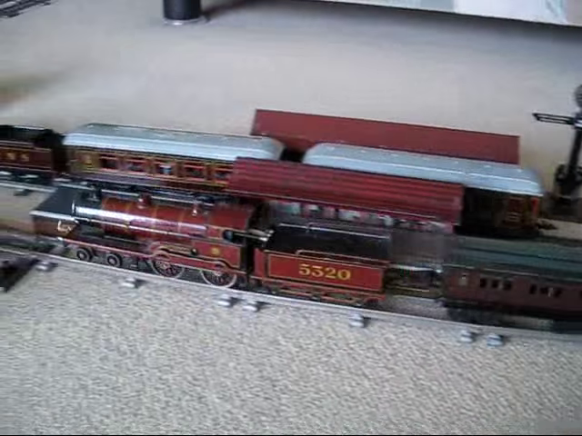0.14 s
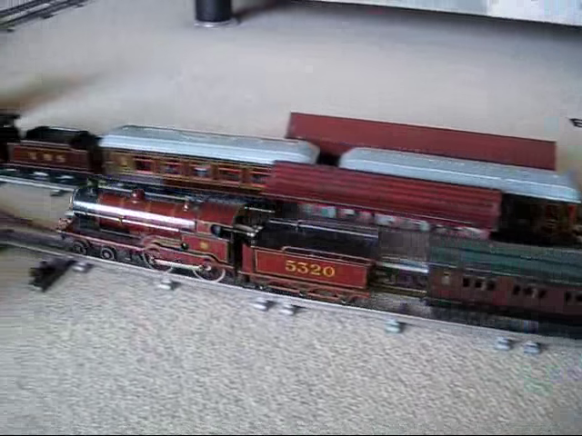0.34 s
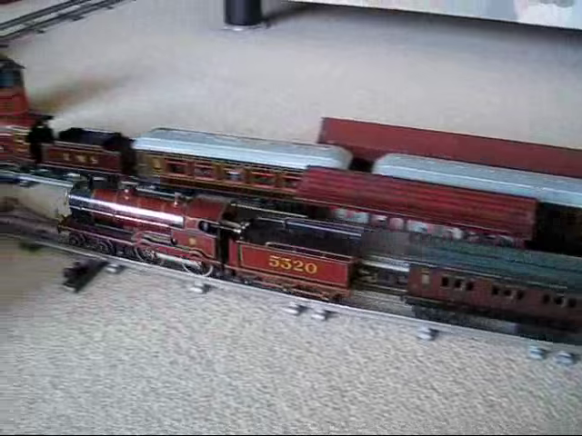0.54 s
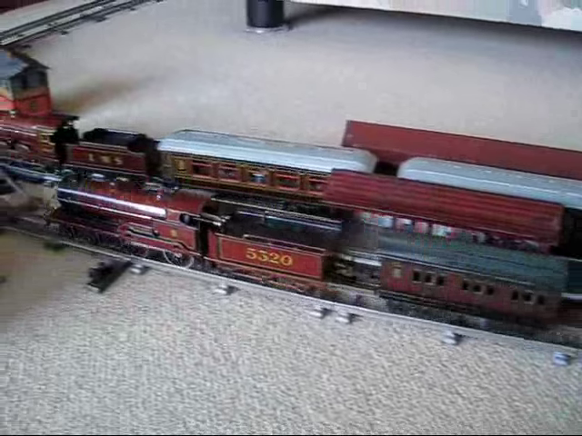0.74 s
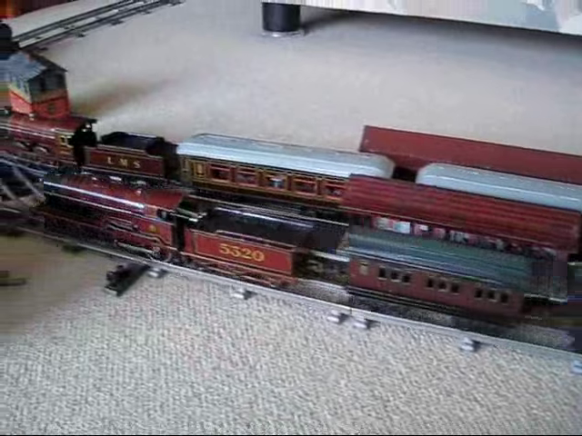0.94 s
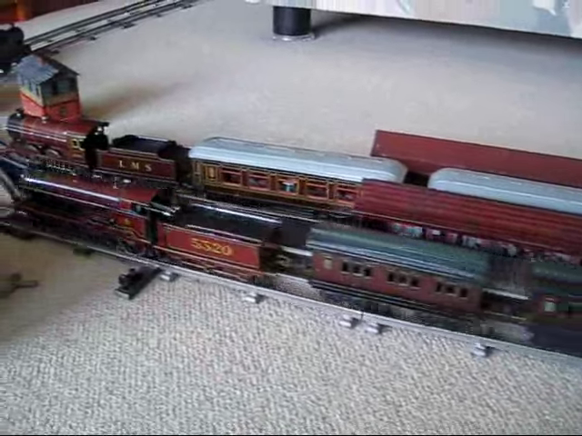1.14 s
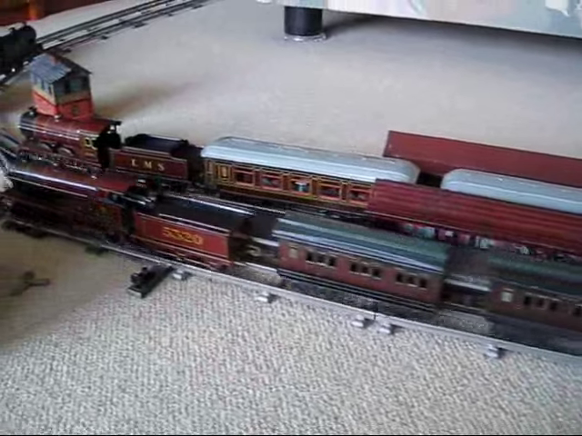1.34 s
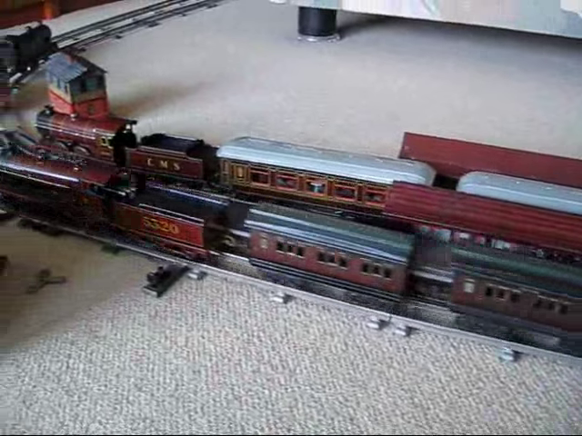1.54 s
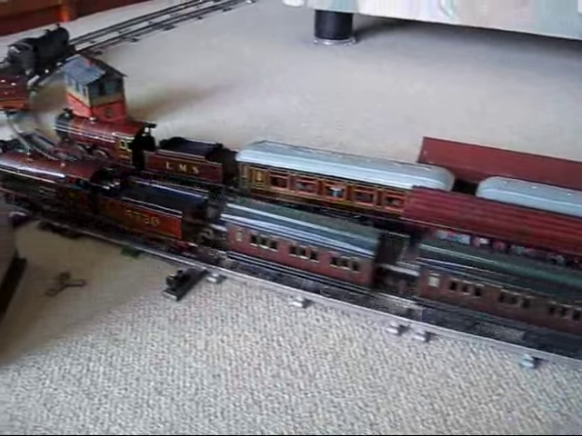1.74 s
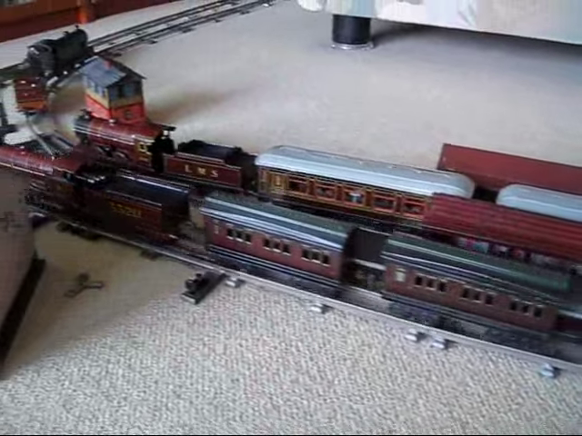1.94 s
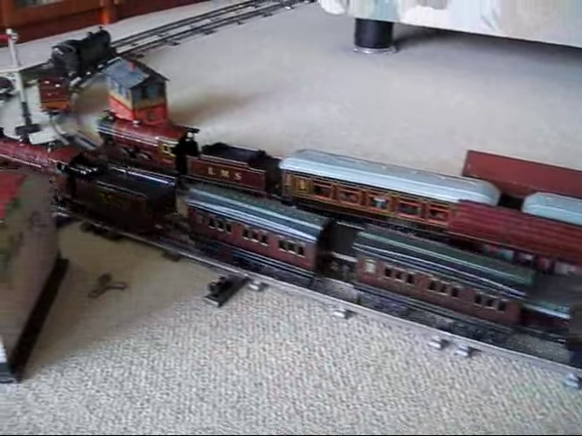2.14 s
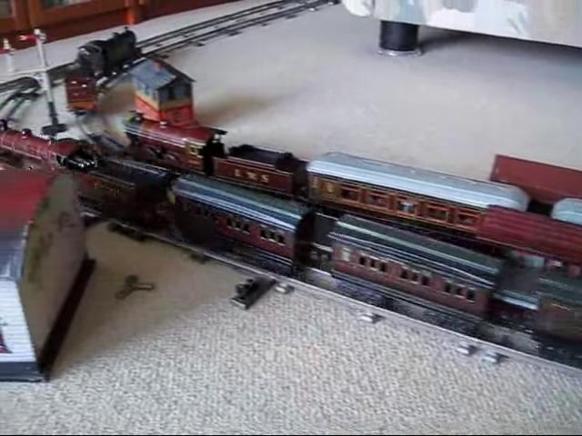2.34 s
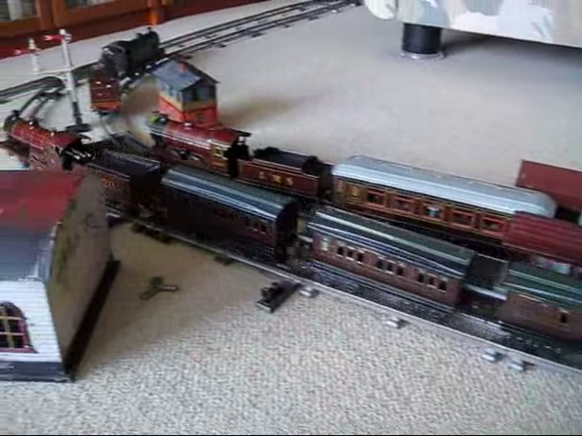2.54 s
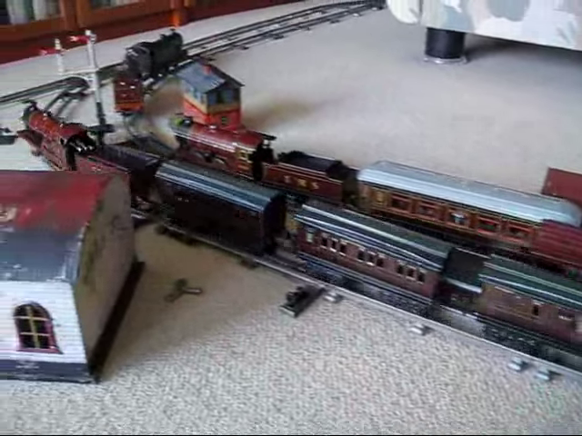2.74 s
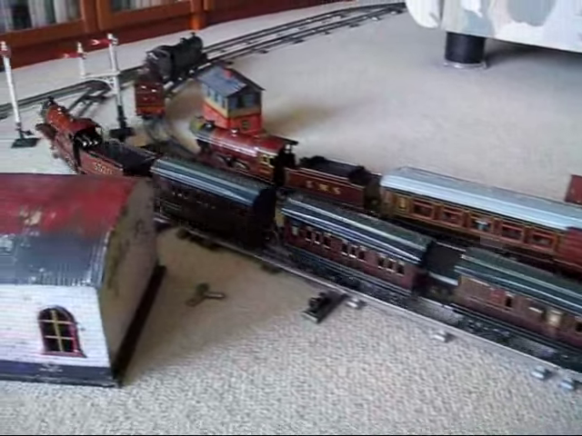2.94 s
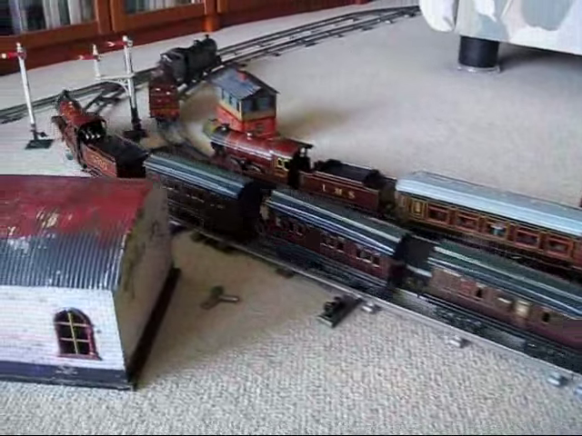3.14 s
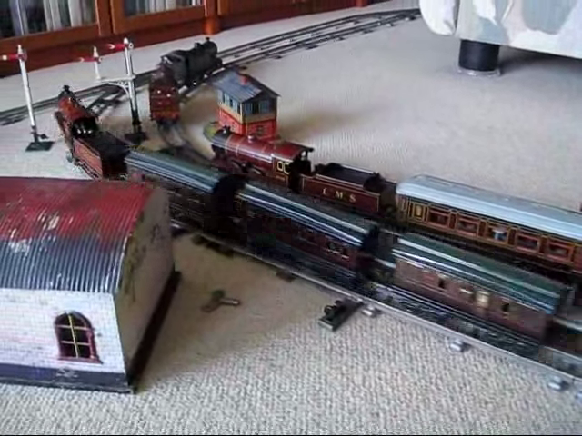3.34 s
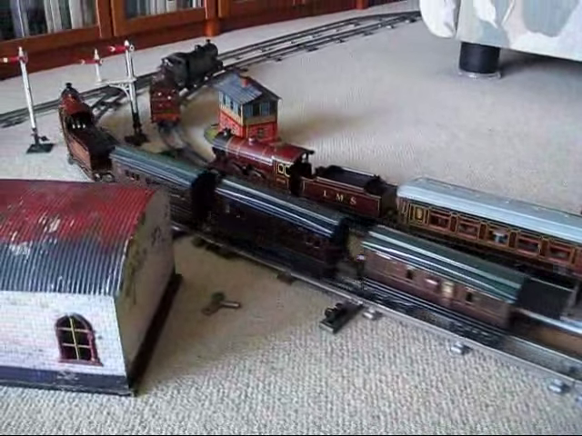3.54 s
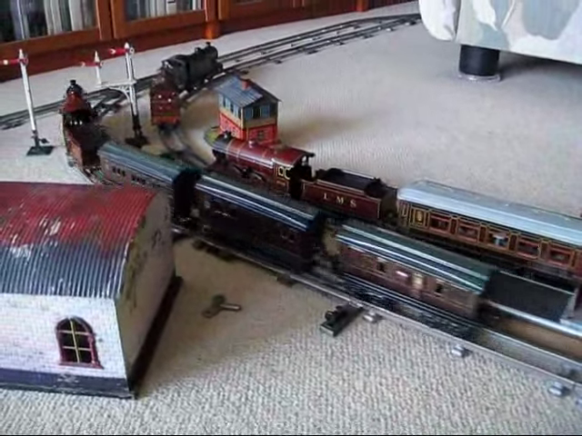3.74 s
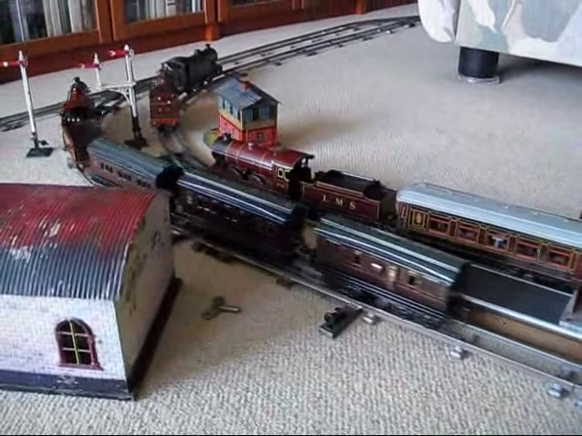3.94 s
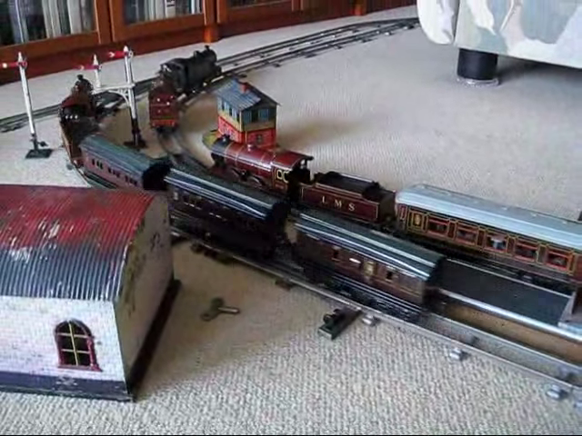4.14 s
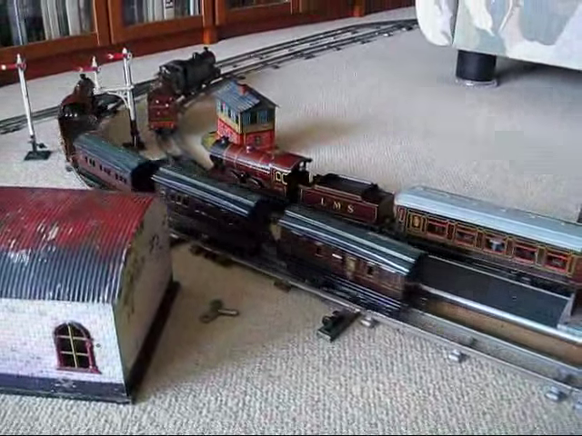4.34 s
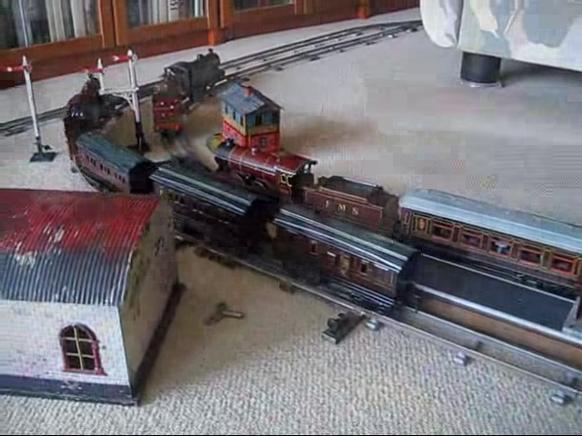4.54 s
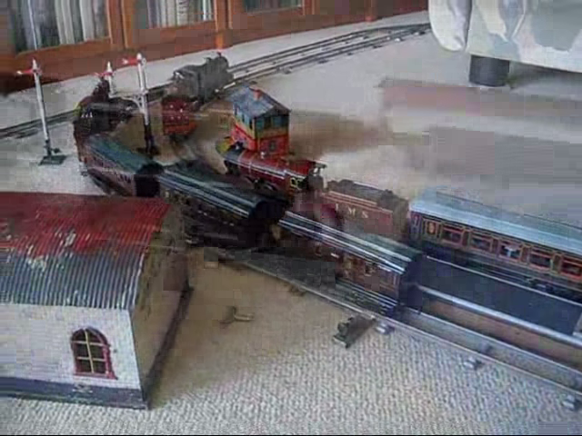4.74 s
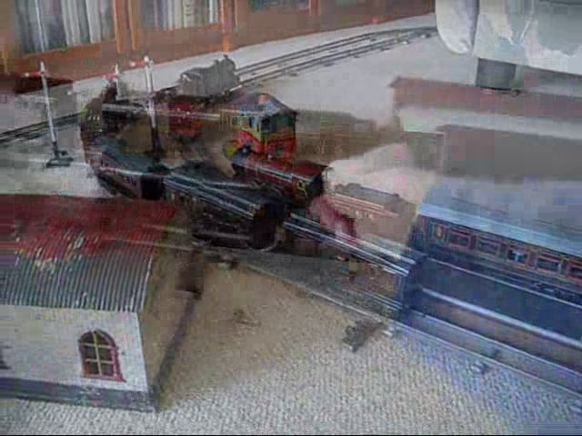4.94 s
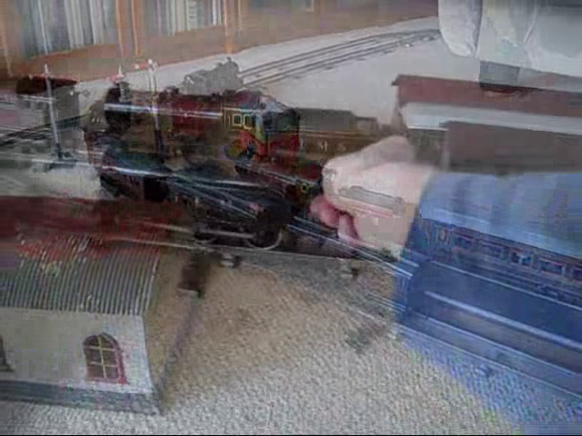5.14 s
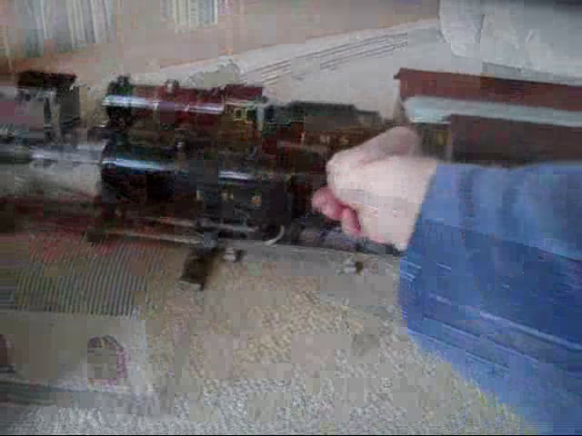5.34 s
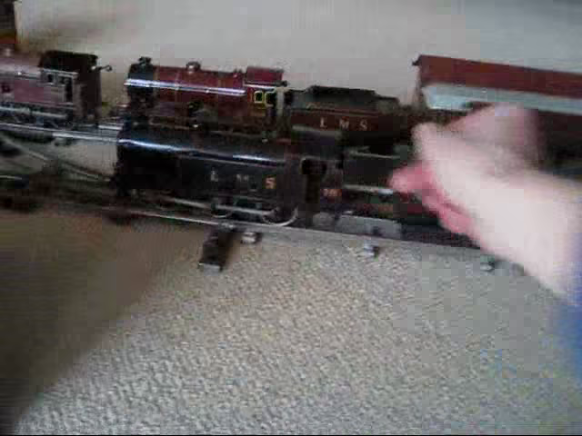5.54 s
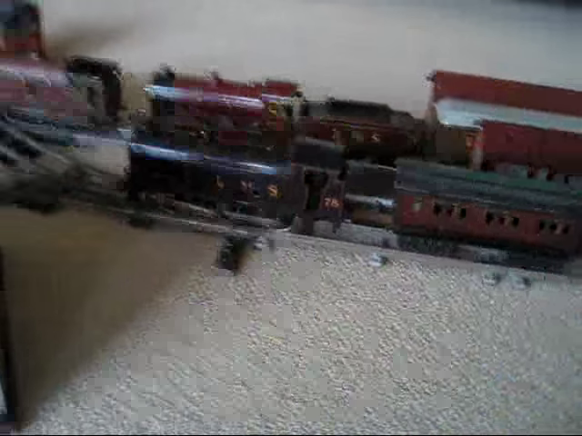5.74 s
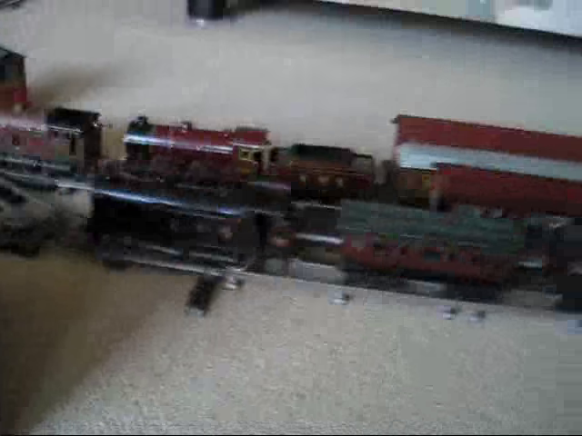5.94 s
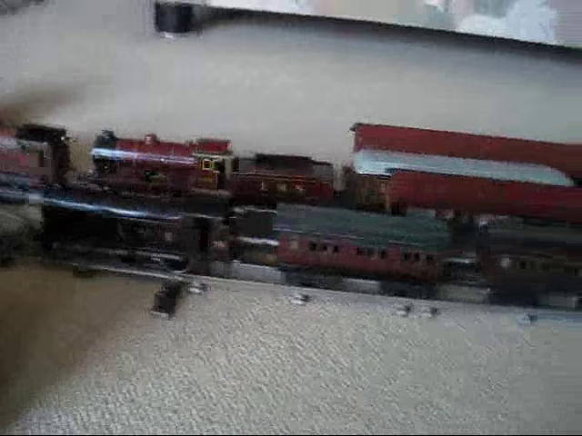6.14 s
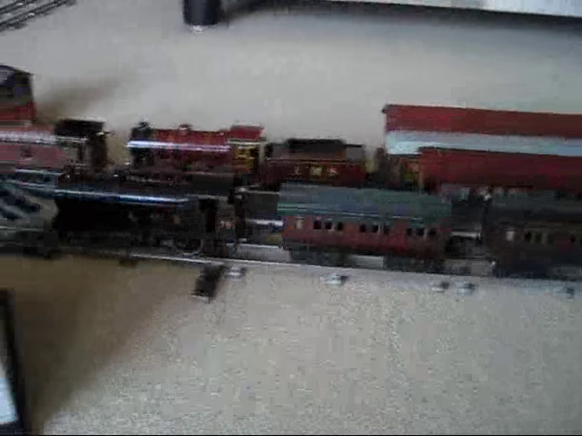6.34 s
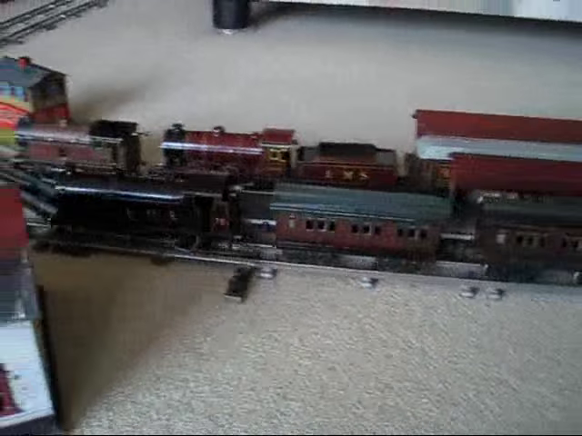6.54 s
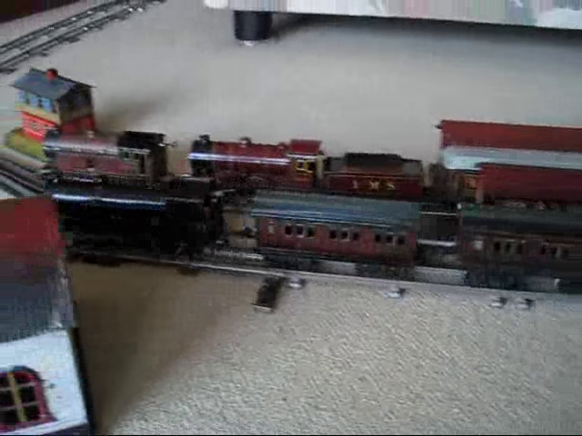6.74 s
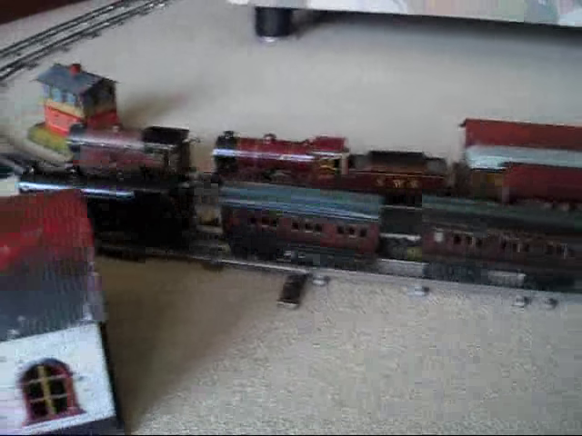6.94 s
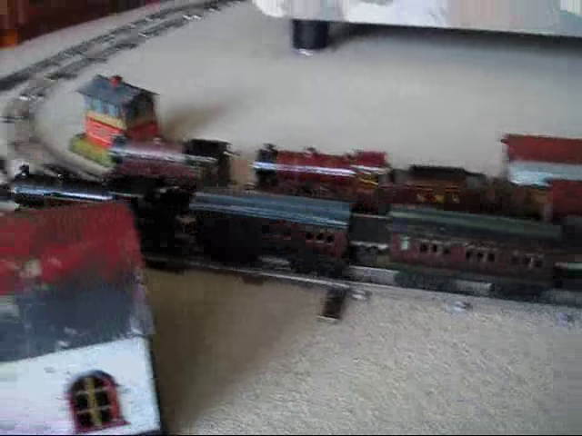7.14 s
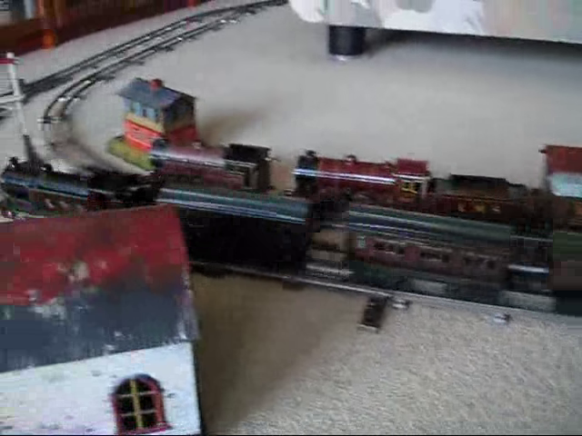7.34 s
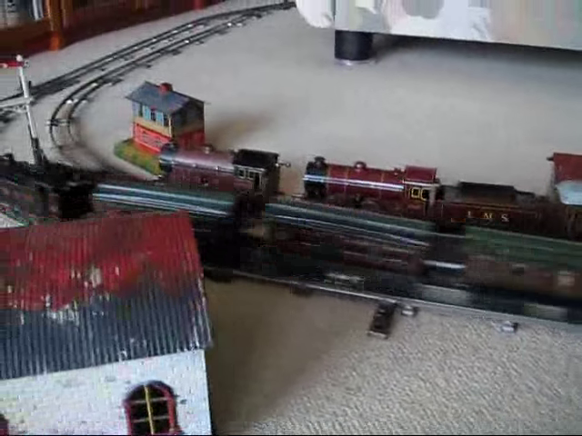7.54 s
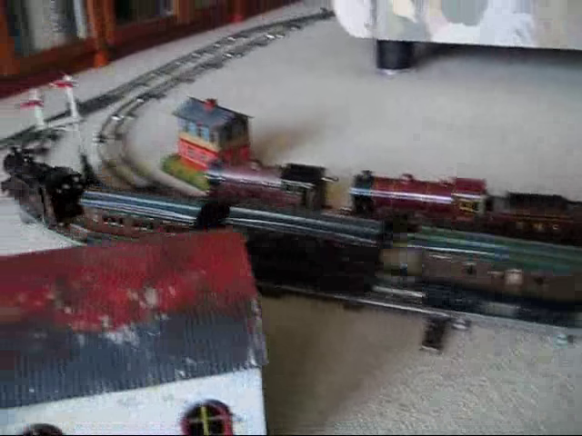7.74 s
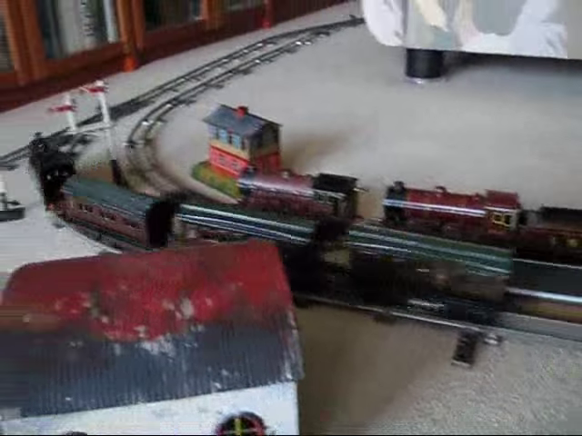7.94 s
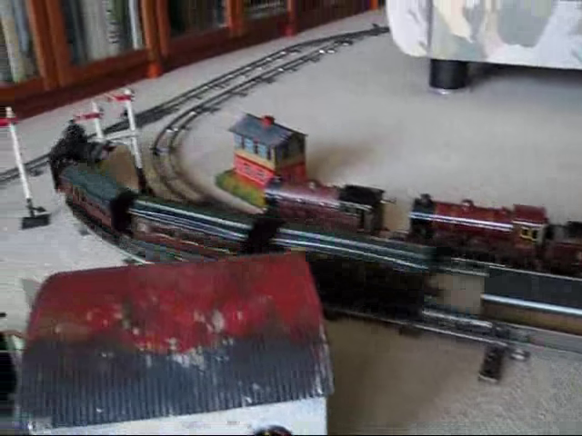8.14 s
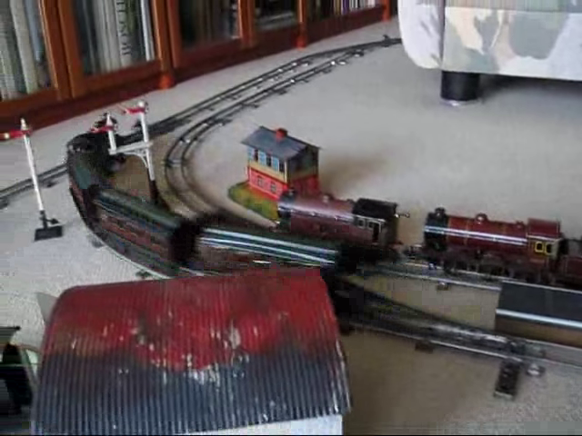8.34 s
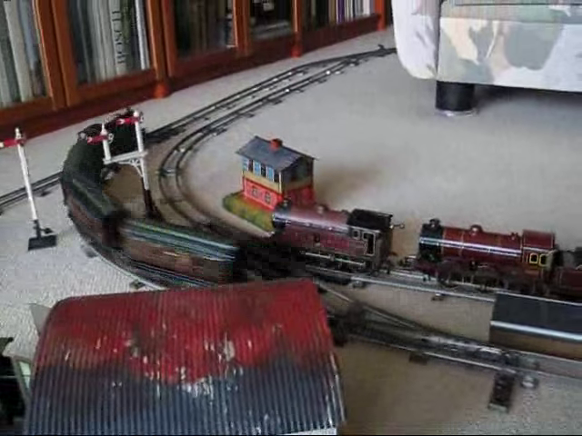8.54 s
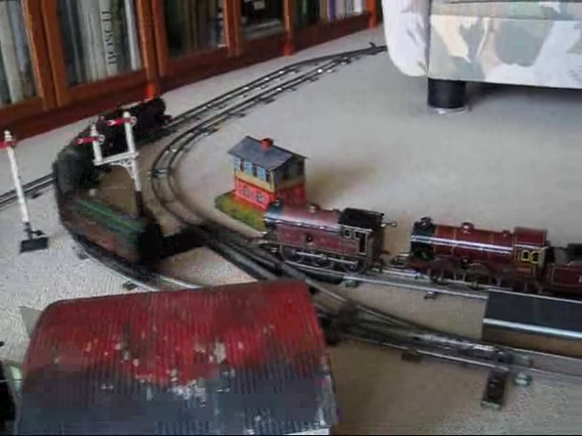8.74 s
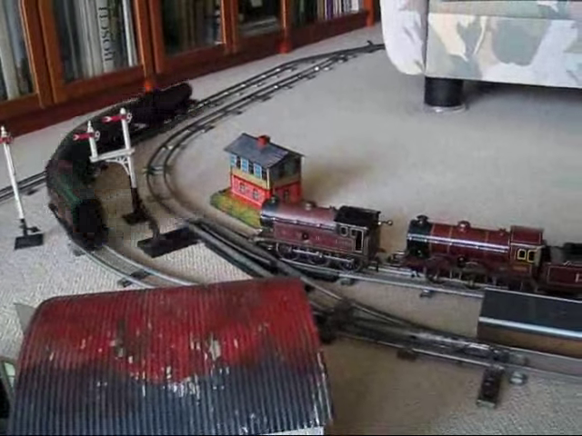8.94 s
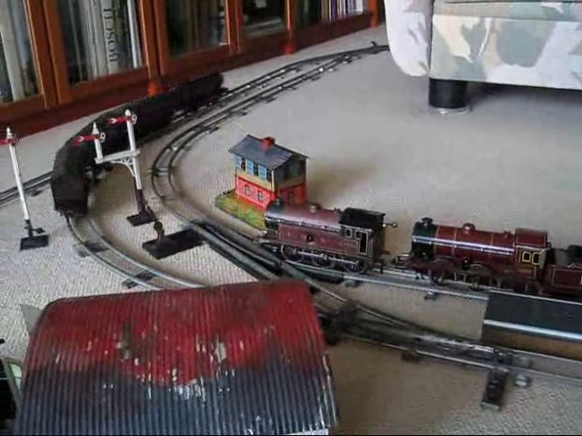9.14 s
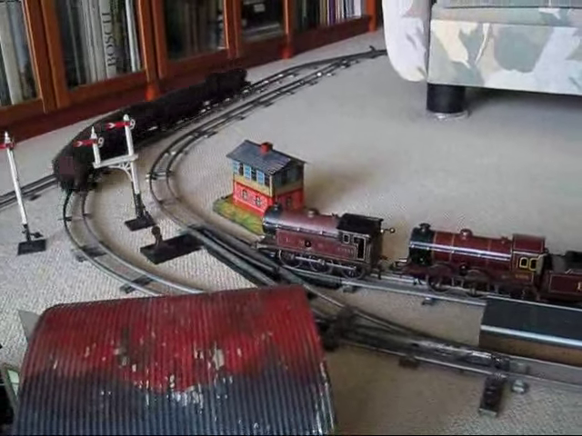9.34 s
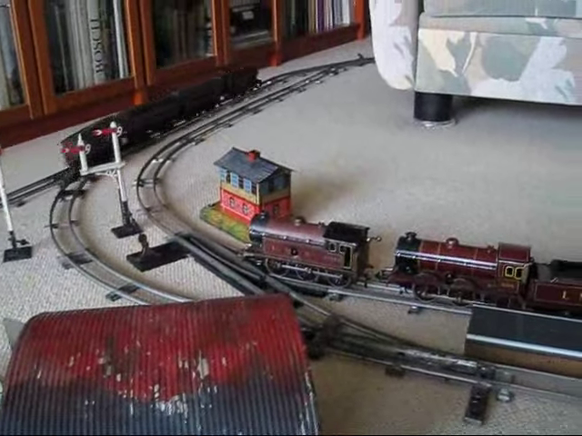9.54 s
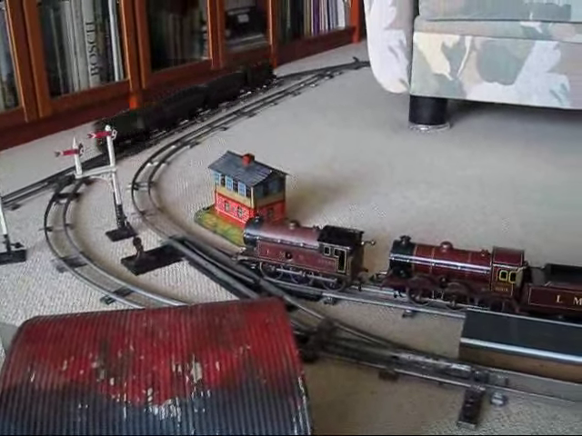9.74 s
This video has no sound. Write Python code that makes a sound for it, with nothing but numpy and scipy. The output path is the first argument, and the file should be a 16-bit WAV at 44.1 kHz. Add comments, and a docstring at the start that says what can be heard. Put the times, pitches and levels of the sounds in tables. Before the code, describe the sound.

Close, slightly coarse camera sound of two toy trains on metal rails. The first is already rattling and whirring, with clicks at the joints and one strong clank, then dies away. Quiet room air and small tin clanks fill the gap. The second starts hesitantly, quickly swells to a hissy, rattling rush, dips briefly, then continues with harsher grinding in the bend. Small, carpeted indoor space.

```python
"""In a small carpeted room, two clockwork tinplate trains run one after the other over metal track.
Noisy wheel knocks rumble through the coaches and grind in the curve; gear ticks whirr in the motor frames.
Random ticks and bright noise make loose tin rattle and flanges chatter; rail joints click.
Between the runs the second engine clanks, as ringing tin modes, while a hand holds it and lets it go.
Short noise echoes give the room around the toys, over a bed of quiet air."""
import sys
import numpy as np
from scipy import signal
from scipy.fft import rfft, irfft, next_fast_len
from scipy.io import wavfile
from scipy.ndimage import uniform_filter1d, map_coordinates

SR = 44100
rng = np.random.default_rng(int(sys.argv[2]) if len(sys.argv) > 2 else 0)


def store_pcm(level_fs):
    """Save levels as 16-bit WAV."""
    pcm = np.round(np.clip(level_fs, -1, 1) * 32767).astype(np.int16)
    wavfile.write(sys.argv[1], SR, np.atleast_2d(pcm).T)


N = 436149

# Rolling wheels of each train, one table a train; the first run fades out near 4.7 s. Each row: time in
# seconds, relative level in dB.
ROLLING_LEVELS = [
    [(0.0, -29), (0.39, -28), (2.13, -27.5), (2.84, -28.5), (3.64, -34), (4.35, -41.5), (4.74, -52.5),
     (4.9, -71)],
    [(5.8, -48.5), (6.25, -39), (6.61, -30.5), (7.01, -27.5), (7.42, -27), (7.95, -36), (9.3, -31),
     (9.89, -31.5)],
]
# Steady shaking of the loose tin, one table a train. Each row: time in seconds, relative level in dB.
SHAKING_LEVELS = [
    [(0.0, -25.5), (1.43, -24.5), (1.85, -25.5), (2.25, -23.5), (3.31, -27.5), (3.52, -29.5), (3.82, -32),
     (4.35, -39), (4.68, -48.5)],
    [(5.8, -55), (5.98, -46.5), (6.82, -25), (7.1, -21.5), (7.35, -20), (7.61, -21), (7.93, -25),
     (9.1, -24), (9.89, -24)],
]
# Wheels striking rail joints and points. Each row: start in seconds, relative strength in dB, pitch in Hz.
RAIL_JOINTS = [(0.0238, -7, 4580), (0.6699, -2, 6450), (0.9004, -7, 3580), (1.1223, -8, 4520),
               (1.5085, -8, 4790), (1.924, -9, 4940), (6.3779, -12, 3260), (6.7196, -5, 10700),
               (7.1766, -6, 3190), (7.3088, -5, 4000), (7.6635, -7, 4680)]
# An engine clanks on the points, in the hand or starting off. Each row: start in seconds,
# clash level in dB, relative body ring in dB, clash decay (t60) in seconds, clash filter width in Hz.
ENGINE_CLANKS = [(0.557, -31, -27, .06, 6000), (2.47, -20.5, -40, 0.076, 3000), (4.7, -42, -54, 0.25, 9000),
                 (4.805, -46, -67, 0.051, 4000), (4.85, -47, -67, .04, 6000), (4.93, -45, -62, 0.23, 5000),
                 (4.982, -40, -39.5, 0.12, 7000), (5.034, -42.5, -44, 0.054, 7000),
                 (5.111, -43, -51, .06, 9000), (5.126, -29.5, -45.5, 0.062, 9000),
                 (5.477, -41, -47, 0.043, 6000), (5.515, -32.5, -47, 0.096, 940),
                 (5.591, -42, -38, .08, 6000), (5.605, -26.5, -29, 0.27, 8000),
                 (5.641, -39, -26, .16, 7000), (5.728, -28, -31, 0.076, 7000), (5.955, -34, -37, .13, 7000),
                 (6.14, -26.5, -53, .08, 2800), (6.159, -30, -52, .035, 2600), (6.213, -34, -35, .04, 2000)]
# Modes of the engine's tin body. Each row: pitch in Hz, relative level in dB, t60 in seconds.
BODY_MODES = [(962, -1, 0.13), (1020, 1.5, 0.26), (1070, -7, 0.11), (1233, -5, 0.19), (1343, -5.5, 0.17),
              (2070, -4.5, 0.25), (3230, -12, 0.19)]
# Resonances of the motor frame. Each row: centre in Hz, width in Hz, relative level in dB.
FRAME_RESONANCES = [(292.6, 22, -4), (697, 22, 3), (742.5, 21, 5), (1015, 210, -8.5), (1865, 90, 1),
                    (3140, 350, 1), (3990, 200, 1), (4380, 320, -10)]
# Colour of the wheel rumble, one table a train. Each row: frequency in Hz, relative level in dB.
RUMBLE_COLOURS = [
    [(60, -66), (120, -30), (210, -14.5), (450, -7), (700, -6), (1000, 0), (1400, -7), (2500, -9),
     (6000, -42)],
    [(60, -54), (120, -33.5), (210, -23), (450, -13.5), (700, -10.5), (1080, -4), (1500, -13),
     (2500, -18.5), (6000, -45)],
]
# Colour of the rattling tin, one table a train. Each row: frequency in Hz, relative level in dB.
TIN_COLOURS = [
    [(200, -53), (700, -5), (1600, -3.5), (2400, -1.5), (3200, 1.5), (4800, 0), (6300, -2.5), (7500, -15.5),
     (10000, -7), (12500, -13.5)],
    [(200, -43), (700, -4), (1600, -3.5), (2400, -1.5), (3200, 0), (4800, 0), (6300, -3.5), (7500, -13),
     (10000, -11), (12500, -8.5)],
]
# Colour of the flange chatter. Each row: frequency in Hz, relative level in dB.
FLANGE_COLOUR = [(2000, -20), (7000, 6), (8700, 4), (9600, 11.5), (10400, 11), (11100, 17), (11700, 12.5),
                 (12500, -3)]
# Colour of the quiet air. Each row: frequency in Hz, relative level in dB.
AIR_COLOUR = [(25, -11), (60, 1), (100, -1.5), (170, 2), (700, -0.5), (1500, -3), (4000, -8), (7000, -13.5),
              (12000, -16.5)]
# How long the small room rings. Each row: frequency in Hz, t60 in seconds.
ROOM_DECAY = [(200, 0.38), (1000, 0.38), (5000, 0.29), (12000, 0.23)]
# Pace of the wheels over the track, before each layer's density.
# Each row: time in seconds, relative knocks a second.
WHEEL_PACE = [(0, 580), (4.6, 573), (5.9, 159), (6.7, 340), (7.4, 1300), (9.89, 2290)]
# The coaches grinding round the curve. Each row: time in seconds, relative level in dB.
GRINDING_LEVELS = [(7.95, -39.5), (8.65, -30), (8.85, -27.5), (9.89, -30)]
# A coach lurches as an axle crosses the points. Each row: centre in seconds, strength in dB.
COACH_LURCHES = [(0.39, 0), (0.57, 1.5), (0.735, 0.5), (1.14, 1.5), (2.265, 0.5), (3.08, 1.5), (3.75, 1.5),
                 (3.96, 4.5), (4.14, 2), (4.48, 3), (6.71, 2.5), (6.81, 1), (6.92, 2.5), (7.75, 3),
                 (7.83, 3), (8.02, 3.5), (8.125, 1.5), (8.38, 2), (8.835, 2)]
# The clatter lets up for a moment. Each row: centre in seconds, length in seconds, change in dB.
CLATTER_LULLS = [(4.677, 0.036, -5), (6.763, 0.045, -3.5), (7.915, 0.093, -3.5), (8.05, .04, -3.5),
                 (8.25, 0.02, -4), (8.57, 0.034, -4.5), (8.655, 0.033, -4), (8.921, .03, -3)]
# Each train leaning into the curve. Each row: entry in seconds,
# relative flange chatter on the straight in dB, extra in the curve in dB.
CURVE_ENTRIES = [(3.1, -7.5, 1.5), (8.1, -4, 5.5)]

TOP_HZ, NOTCH_HZ = 12480, 7830  # the camera's band limit and treble notch
LURCH_S, LURCH_EDGE_S = 0.065, 0.014  # length of a lurch, and of its rise and fall
LULL_EDGE_S = 0.02  # fall and rise of a lull
LURCH_RUMBLE = 1  # share of a lurch or lull, in dB, that reaches rumble and motor
BEND_S = 0.52  # time for the flanges to press home
CLASH_HZ = 3700  # centre of every clash of wheel on rail
HUNT_DB, HUNT_PER_S = 2, 20  # scale and random knots a second of the wheels' side-to-side hunting


def amp(db):
    """Decibels to gain."""
    return 10 ** (np.asarray(db) / 20)


def unit(x):
    """Scale x to rms 1."""
    return x / np.sqrt(np.mean(x ** 2) + 1e-20)


def along(points, hz):
    """Interpolate (Hz, value) points on a log frequency axis."""
    f, v = np.transpose(points)
    return np.interp(np.log(hz + 1), np.log(f + 1), v)


def gains(rows):
    """One gain per sample from (seconds, dB) rows, fading at 200 dB a second beyond their ends."""
    s, db = np.transpose(rows)
    t = np.arange(N) / SR
    outside = np.abs(t - np.clip(t, s[0], s[-1]))
    return amp(np.interp(t, s, db) - 200 * outside)


def wobble(rate):
    """A smooth random curve, rate knots a second."""
    knots = rng.standard_normal(int(N * rate / SR) + 4)
    return map_coordinates(knots, [np.arange(N) * rate / SR])


def filtered(x, response):
    """Filter x by a response of frequency."""
    m = next_fast_len(len(x) + 8192)
    return irfft(rfft(x, m) * response(np.fft.rfftfreq(m, 1 / SR)), m)[:len(x)]


def coloured(x, spectrum):
    """Filter x by a table of levels over frequency, at rms 1."""
    return unit(filtered(x, lambda hz: amp(along(spectrum, hz))))


def resonance(f, hz, width):
    """Causal response of one resonance."""
    return 1j * f * width / (hz * hz - f * f + 1j * f * width)


def burst(t60):
    """Many close modes of thin metal, struck once: a quarter second of dying noise."""
    t = np.arange(SR // 4) / SR
    return rng.standard_normal(len(t)) * amp(-60 * t / t60)


def add(track, s, sound):
    """Mix a sound into the track at time s."""
    part = track[max(0, round(s * SR)):][:len(sound)]
    part += sound[:len(part)]


def swell(at, length, edge):
    """A rise, hold and fall between 0 and 1, centred on a time."""
    return np.clip((length / 2 - np.abs(np.arange(N) / SR - at)) / edge + 0.5, 0, 1)


def ticks(knocks, top_hz, t60):
    """Every knock strikes another small part, which rings briefly at its own pitch up to top_hz."""
    at = np.flatnonzero(knocks)[:, None]
    step = np.arange(SR // 150)
    hz = top_hz * rng.random(at.shape)
    rings = knocks[at] * np.sin(2 * np.pi * hz * step / SR) * amp(-60 * step / SR / t60)
    return np.bincount((at + step).ravel(), rings.ravel(), N + len(step))[:N]


def contacts(density, spread_db, clump_db, t60, snap, top_hz, tick_t60):
    """Random knocks at the wheels' pace, in clumps: each a pitched tick and a short wash of close modes."""
    rate = density * np.interp(np.arange(N) / SR, *np.transpose(WHEEL_PACE))
    spread = spread_db * np.clip(rng.standard_normal(N), -2, 2)
    sizes = amp(spread + clump_db * np.tanh(wobble(70)))
    knocks = (rng.random(N) < rate / SR) * sizes * rng.choice([-1, 1], N)
    # the wash is noise that follows the summed, decaying energy of the knocks
    decay = amp(-60 * np.arange(SR // 4) / SR / t60) ** 2
    energy = np.abs(signal.oaconvolve(knocks ** 2, decay)[:N])
    wash = np.sqrt(energy) * rng.standard_normal(N)
    out = snap * unit(ticks(knocks, top_hz, tick_t60)) + unit(wash)
    # even out the level over a twelfth of a second, leaving the quick clatter
    return out / np.sqrt(np.abs(uniform_filter1d(out ** 2, size=SR // 12)) + 1e-9)


def sway():
    """Decibels by which lurches and lulls move the clatter."""
    lurches = sum(db * swell(s, LURCH_S, LURCH_EDGE_S) for s, db in COACH_LURCHES)
    lulls = sum(db * swell(s, length, LULL_EDGE_S) for s, length, db in CLATTER_LULLS)
    return lurches + lulls


def wheels():
    """Rough rails drum on the hollow coaches, which grind at a higher pitch in the curve."""
    bumps = contacts(density=2, spread_db=2.0, clump_db=2.0, t60=0.1,
                     snap=0.28, top_hz=3680, tick_t60=0.011)
    drumming = sum(gains(rolling) * coloured(bumps, colour)
                   for rolling, colour in zip(ROLLING_LEVELS, RUMBLE_COLOURS))
    slips = contacts(density=1, spread_db=4.5, clump_db=-1.5, t60=0.032,
                     snap=0.2, top_hz=3980, tick_t60=0.021)
    grinding = unit(filtered(slips, lambda f: resonance(f, 1780, width=3060) ** 2))
    return drumming + amp(1.5) * gains(GRINDING_LEVELS) * grinding


def motor(teeth_hz):
    """Gear teeth tick and scrape unevenly into the motor's resonant frame."""
    turns = np.cumsum(teeth_hz * (1 + 0.06 * wobble(5) + 0.16 * wobble(150))) / SR
    teeth = np.diff(np.floor(turns), prepend=0) * amp(4.6 * rng.standard_normal(N))
    scrape = rng.standard_normal(N) * np.exp(-2.2 * (turns % 1))  # dies away after each tooth
    frame = lambda f: sum(amp(db) * resonance(f, hz, width) for hz, width, db in FRAME_RESONANCES)
    whirr = unit(filtered(0.21 * unit(teeth) + unit(scrape), frame))
    return amp(-3.5) * sum(map(gains, ROLLING_LEVELS)) * whirr


def pressure(entry, straight_db, curve_db):
    """Gain of the flange chatter: it comes and goes, and grows as a train enters the curve."""
    leaning = np.clip((np.arange(N) / SR - entry) / BEND_S, 0, 1)
    return amp(straight_db + curve_db * leaning + HUNT_DB * wobble(HUNT_PER_S))


def rattle():
    """Axles and couplings rattle; the flanges chatter against the rail in tiny bright bursts."""
    tin = contacts(density=1.7, spread_db=4.5, clump_db=3.5, t60=0.059,
                   snap=0.53, top_hz=12870, tick_t60=0.0041)
    scuffs = contacts(density=0.54, spread_db=6.5, clump_db=3, t60=0.033,
                      snap=0.15, top_hz=12440, tick_t60=0.01)
    flange = coloured(scuffs, FLANGE_COLOUR)
    out = np.zeros(N)
    for shaking, bend, colour in zip(SHAKING_LEVELS, CURVE_ENTRIES, TIN_COLOURS):
        chatter = amp(-5.5) * pressure(*bend) * flange
        out += gains(shaking) * (amp(-1) * coloured(tin, colour) + chatter)
    return out


def joints():
    """A wheel drops over a gap: a hard click with a short ring."""
    out, t = np.zeros(N), np.arange(SR // 4) / SR
    for s, db, hz in RAIL_JOINTS:
        click = np.sin(2 * np.pi * hz * t) * amp(-60 * t / 0.006)
        ring = filtered(burst(0.03), lambda f: resonance(f, hz, 0.35 * hz))
        add(out, s, amp(db - 1) * (click + 0.45 * ring))
    return out


def clanks(attack, clash_attack):
    """Wheels clash on the rails, and the tin body swells into its ring; attacks in seconds."""
    out, t = np.zeros(N), np.arange(SR // 4) / SR
    for s, clash_db, ring_db, length, width_hz in ENGINE_CLANKS:
        strike = burst(length) * (1 - np.exp(-t / clash_attack))
        clash = filtered(strike, lambda f: resonance(f, CLASH_HZ, width_hz) ** 2 + 0.045)
        add(out, s, amp(clash_db) * clash / np.std(clash[:SR // 100]))  # level over the first 10 ms
        # the loose body keeps buzzing on its wheels, which roughens every mode
        drift = lambda: 0.08 * np.cumsum(rng.standard_normal(len(t)))
        ring = sum(amp(db - 60 * t / t60) * np.sin(2 * np.pi * f * t + drift())
                   for f, db, t60 in BODY_MODES)
        add(out, s, amp(ring_db) * ring * (1 - np.exp(-t / attack)))
    return out


def room(x):
    """The carpeted room answers with brief decaying noise, a new echo pattern every 0.2 s."""
    out, hop = np.zeros(N), SR // 5
    for start in range(0, N, hop):
        hz, t, z = signal.stft(rng.standard_normal(SR // 3), SR, nperseg=256)
        decay = amp(-60 * t / along(ROOM_DECAY, hz)[:, None])
        tail = signal.istft(z * decay, SR, nperseg=256)[1]
        echo = signal.fftconvolve(x[start:start + hop], tail / np.linalg.norm(tail))
        add(out, start / SR + 0.003, echo)  # 3 ms behind the direct sound
    return out


def scene():
    """Both trains, the handling between them and the quiet air of the room."""
    sway_db = sway()
    running = wheels() + motor(teeth_hz=104.7)
    toys = amp(LURCH_RUMBLE * sway_db) * running + amp(sway_db) * rattle()
    toys = toys + joints() + clanks(attack=0.0051, clash_attack=0.0033)
    air = amp(-51.5) * coloured(rng.standard_normal(N), AIR_COLOUR)
    return (toys + amp(-9.0) * room(toys) + air)[None]


def record(dry):
    """The camera's microphone hears with a deep, narrow treble notch and a steep band limit."""
    notch = lambda f: np.abs(1 - resonance(f, NOTCH_HZ, width=340)) ** 8
    limit = lambda f: 1 / np.sqrt(1 + (f / TOP_HZ) ** 260)
    return filtered(dry[0], lambda f: notch(f) * limit(f))[None]


dry = scene()
out = record(dry)
store_pcm(out)
```